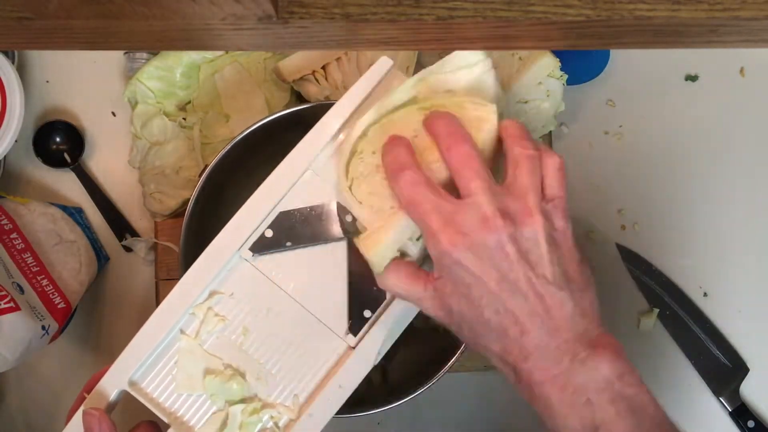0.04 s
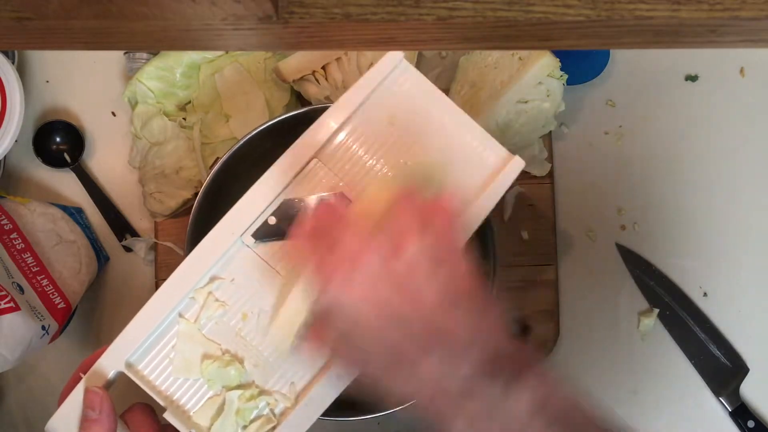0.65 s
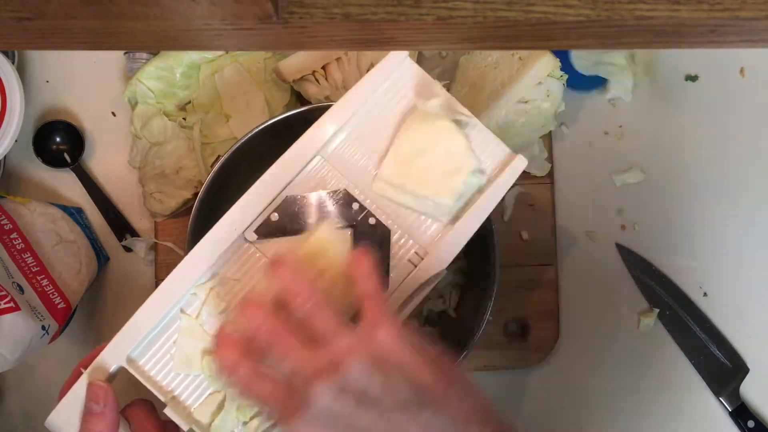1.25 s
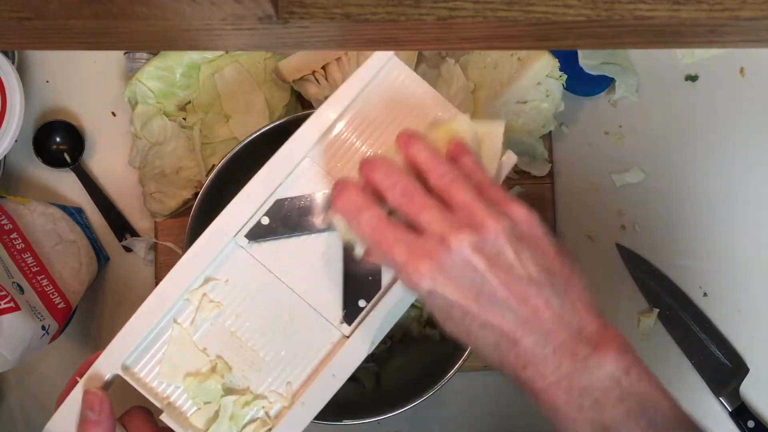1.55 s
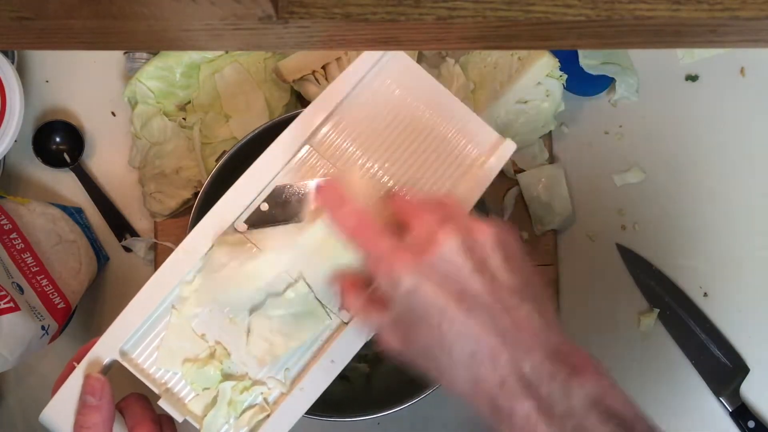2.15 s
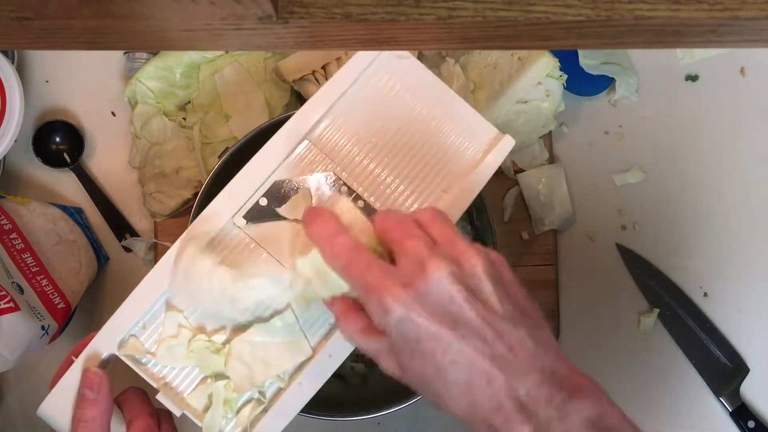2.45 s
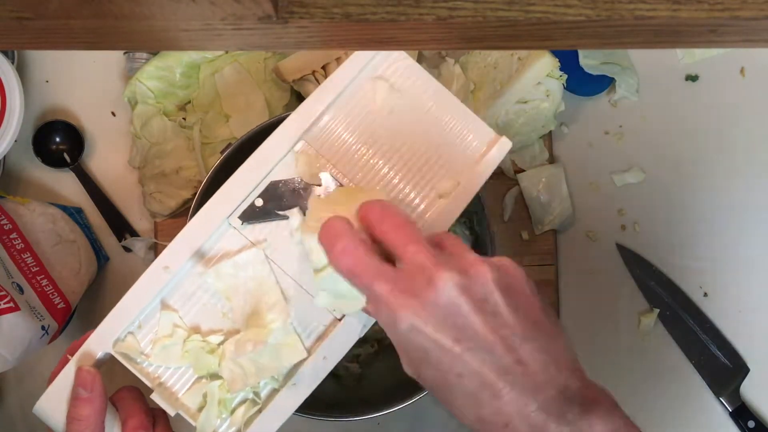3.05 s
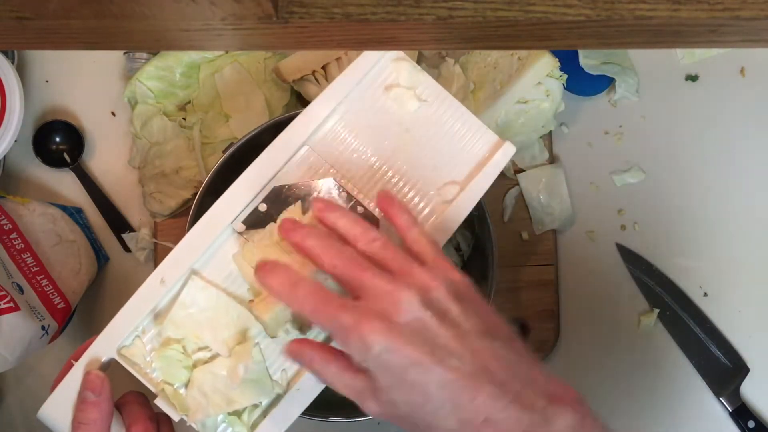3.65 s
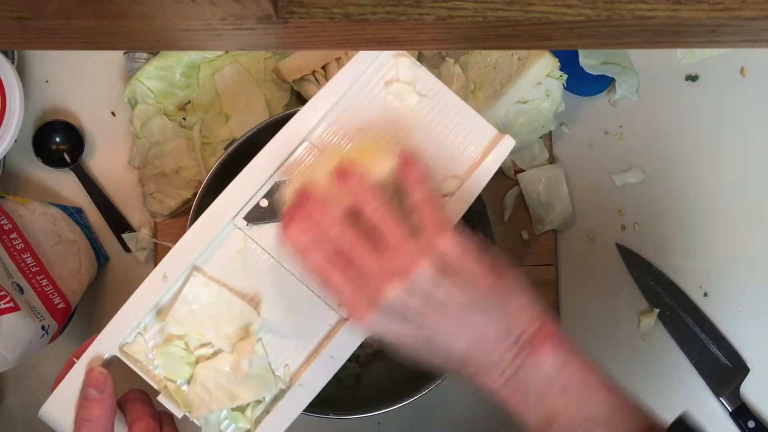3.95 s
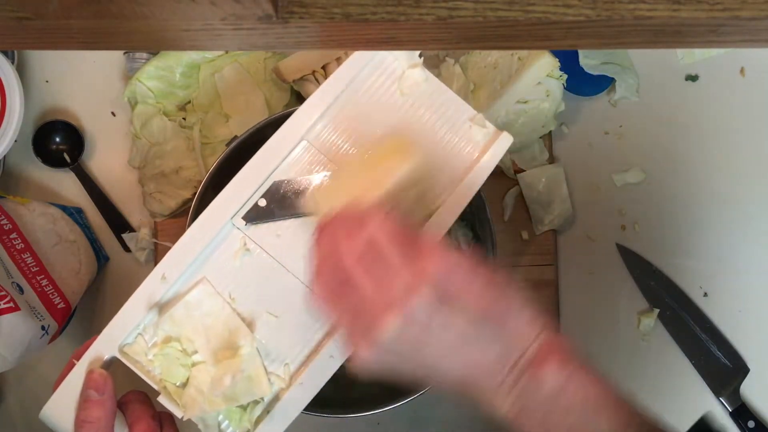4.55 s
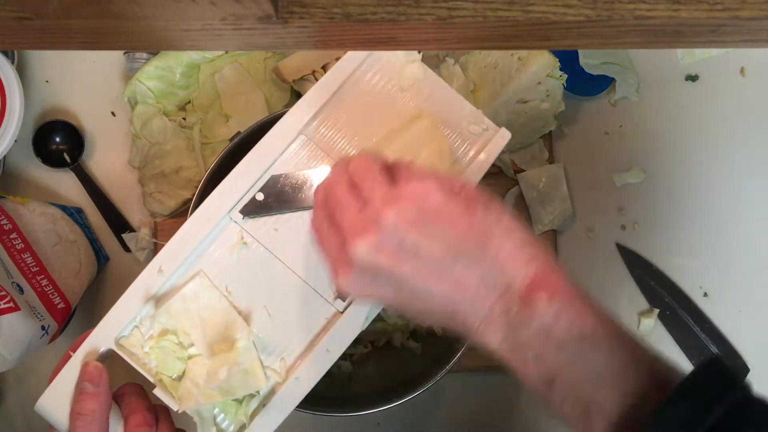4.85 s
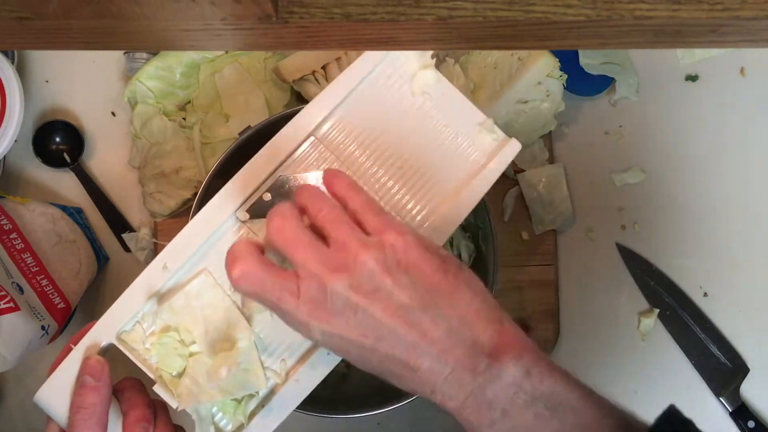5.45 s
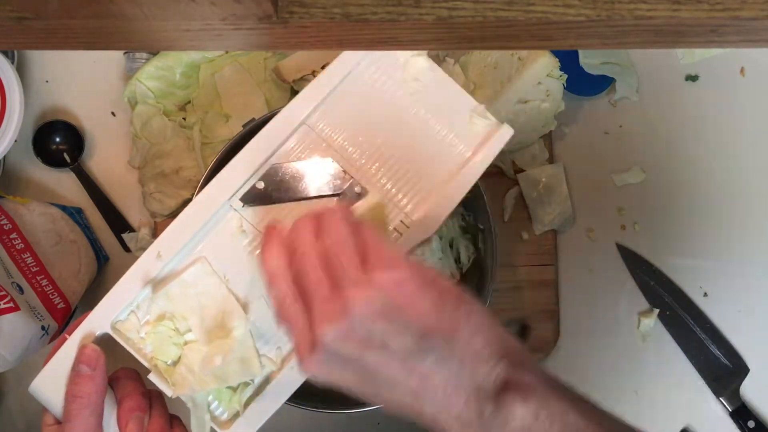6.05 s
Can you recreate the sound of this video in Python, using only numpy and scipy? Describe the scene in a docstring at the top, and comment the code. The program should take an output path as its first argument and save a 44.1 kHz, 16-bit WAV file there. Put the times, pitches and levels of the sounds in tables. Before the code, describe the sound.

Cabbage is pushed back and forth over a plastic slicer, with rasping strokes, crisp snaps and short pauses.

```python
"""In a small kitchen, a chunk of cabbage is pushed to and fro over a plastic slicer resting on a bowl.
From the start, rubbing shakes the frame and the ribbed plate, leaves rasp through the blade, and stiff
ribs snap. Between strokes, loose shreds tick and an appliance hums faintly. After a second and a half
comes the first of a few tiny wet squeaks. The loudest cracks follow between two and three seconds,
and after five seconds the strokes turn mostly lighter and shorter."""
import sys
import numpy as np
from scipy import signal
from scipy.fft import rfft, irfft
from scipy.io import wavfile

SR = 44100
rng = np.random.default_rng(int(sys.argv[2]) if len(sys.argv) > 2 else 0)


def unload_audio(sound):
    """Save the sound as a 16-bit wav file, at the path given as the first command line argument."""
    columns = np.transpose(np.atleast_2d(sound))
    # keep every value between -1 and 1, then stretch to whole-number steps
    steps = np.round(np.clip(columns, -1, 1) * 32767)
    wavfile.write(sys.argv[1], SR, steps.astype(np.int16))


N = 278271
TIME = np.arange(N) / SR
# tone colour of a leaf being cut: pitch_hz, level_db
CUT_SPECTRUM = [(900, -16.5), (2600, 9), (3500, -16.5), (5300, 9), (6900, 0.5), (8000, 4), (11000, 3),
                (13500, 2), (16000, -1.5)]


def undb(db):
    """Turn decibels into a number to multiply by."""
    return 10 ** (np.asarray(db) / 20)


def unit(x):
    """Scale a sound to a total energy of one."""
    return x / np.sqrt(np.sum(x ** 2) + 1e-18)


def steady(x):
    """Scale a sound to an average level (rms) of one."""
    return unit(x) * np.sqrt(len(x))


def through(x, response):
    """Pass a sound through a response: the sound a thing makes after one click."""
    return signal.oaconvolve(x, response)[:len(x)]


def wander(rate):
    """A value that drifts around zero, heading for a new random spot `rate` times a second."""
    return 1.2 * np.interp(TIME * rate, np.arange(8192), rng.standard_normal(8192))


def colour(points, size=4096):
    """A click with the tone colour given by (pitch_hz, level_db) points."""
    hz, db = np.transpose(points)
    grid_hz = np.arange(size // 2 + 1) * SR / size
    gain = undb(np.interp(np.log(grid_hz + 1), np.log(hz), db))
    # these steps pack the energy at the start of the click
    cepstrum = irfft(np.log(gain))
    cepstrum[1:size // 2] *= 2
    cepstrum[size // 2 + 1:] = 0
    return unit(irfft(np.exp(rfft(cepstrum))))


def ringing(modes, size=4096):
    """One fading tone for each mode (a pitch a part rings at); wide modes die first."""
    hz, width, db = np.transpose(modes)[:, :, None]
    t = np.arange(size) / SR
    return undb(db) * width * np.exp(-np.pi * width * t) * np.sin(2 * np.pi * hz * t)


def band(x, low_hz, high_hz, order):
    """Keep what lies between two pitches."""
    return signal.sosfilt(signal.butter(order, [low_hz, high_hz], "band", fs=SR, output="sos"), x)


def echoes(fade_s, db, size=4096):
    """A click followed by a dense patter of echoes that falls 60 dB in fade_s."""
    t = np.arange(size) / SR
    response = undb(db) * unit(rng.standard_normal(size) * undb(-60 * t / fade_s))
    response[0] += 1
    return unit(response)


def uneven(rate, spread_db, unevenness, size=2048):
    """Clicks of uneven strength at uneven times, roughly `rate` a second."""
    gaps, heights = rng.standard_normal((size, 2)).T
    at = (np.cumsum(np.exp(unevenness * gaps)) / rate * SR).astype(int)
    clicks = np.zeros(N)
    clicks[at[at < N]] = undb(spread_db * np.clip(heights[at < N], -2, 2))
    return clicks


def slicer():
    """How frame, plate and blade ring; such small parts give off little sound below their lowest modes."""
    # the frame bending over the bowl: pitch_hz, width_hz, level_db
    frame_modes = [(141.2, 22, 5.5), (219.8, 9.3, 0.5), (261.5, 14, -2.5), (284.4, 36.3, 6.5),
                   (400.6, 12, -3.5), (449.4, 36, -0.5), (493, 37, -15), (575, 305, -14.5), (754, 89, -5),
                   (795.4, 31, -4.5)]
    # the plastic plate ringing: pitch_hz, width_hz, level_db
    plate_modes = [(1150, 39, 4.5), (1247, 97, 0.5), (1380, 40, -34.5), (1569, 53, 5.5), (1662, 45, 11.5),
                   (1874, 29, 13.5), (1967, 39, 7.5), (2097, 100, 8), (2239, 97, 10.5), (2580, 43, -37),
                   (2540, 990, -4.5), (2750, 160, -0.5), (3100, 36, -12.5)]
    # the blade and its seat ringing: pitch_hz, width_hz, level_db
    blade_modes = [(3840, 24, 8.5), (4360, 31, 5), (4900, 110, -5.5), (5320, 100, -2), (5460, 440, 0),
                   (5750, 350, -15), (6410, 240, 5.5), (6660, 15, 4)]
    frame = band(ringing(frame_modes), 178.4, 771, order=7)
    plate = band(ringing(plate_modes), 1290, 4290, order=4)
    blade = band(ringing(blade_modes), 4000, 7270, order=2)
    return frame, plate, blade


def sliding(attack_s=0.0027, release_s=0.022):
    """Strength of rumble, crunch and rasp: each stroke starts fast, swells or eases, and runs out."""
    # pushes, returns and light shifts: start_s, end_s, rumble_db, crunch_db, rasp_db, swell_db
    moves = [(0.0, 0.081, -42, -53, -48.5, -5), (0.117, 0.208, -46, -53, -50.5, -2),
             (0.36, 0.422, -45.5, -52, -50, -0.5), (0.501, 1.115, -43, -49.5, -49, -2),
             (1.2, 1.35, -45, -53.5, -51.5, 1), (1.403, 1.57, -48.5, -55, -52, -3),
             (1.611, 1.787, -46.5, -55, -57, -6), (1.888, 2.074, -69, -70, -63, 16.5),
             (2.11, 2.513, -47, -53.5, -54, 0), (2.698, 3.034, -46.5, -50.5, -50.5, -5.5),
             (3.238, 3.344, -49, -56.5, -52.5, 0.5), (3.359, 3.601, -43, -50, -50, -6.5),
             (3.854, 4.287, -46.5, -52, -51, 3.5), (4.314, 4.764, -48.5, -53, -53, -0.5),
             (4.787, 4.982, -47.5, -51.5, -52, 0.5), (4.993, 5.08, -53, -63.5, -63.5, 7),
             (5.169, 5.494, -58, -67, -67, -1), (5.561, 5.613, -49, -55.5, -61, 2),
             (5.668, 5.715, -53, -57, -58, 5), (5.856, 5.968, -54.5, -71, -71, 1),
             (6.045, 6.277, -47, -58.5, -57.5, 3.5)]
    power = np.zeros((3, N))
    for start, end, *levels_db, swell_db in moves:
        progress = np.clip((TIME - start) / (end - start), 0, 1)
        rise = np.clip((TIME - start) / attack_s, 0, 1)
        fall = np.exp(-np.maximum(TIME - end, 0) / release_s)
        swell = undb(swell_db * (progress - .5))
        power += np.outer(undb(levels_db), rise * fall * swell) ** 2
    return np.sqrt(power)


def jerks(rate, fade_s, spread_db, size=2048):
    """The chunk sticks, then lets go with a jerk that dies away, again and again."""
    fade = np.exp(-np.arange(size) / SR / fade_s)
    return steady(through(uneven(rate, spread_db, unevenness=.5), fade))


def grains(rate, spread_db):
    """Tiny slips or bursting cells: random clicks, about `rate` a second."""
    happens = rng.random(N) < rate / SR
    strength = undb(spread_db * np.clip(rng.standard_normal(N), -2, 2))
    return steady(happens * strength * rng.choice([-1, 1], N))


def leaves(leaf_s=0.026, size=4096):
    """Leaf after leaf passes the blade, each a short swell that peaks early."""
    progress = np.minimum(np.arange(size) / SR / leaf_s, 1)
    swell = np.sin(np.pi * progress ** 0.56) ** 2
    return undb(-3) * steady(through(uneven(rate=34, spread_db=4, unevenness=.65), swell))


def tearing(fade_s, follow_db, size=4096):
    """One fibre gives way, then its neighbours in a quick, fading burst."""
    t = np.arange(size) / SR
    burst = rng.standard_normal(size) * (rng.random(size) < 5000 / SR)
    burst *= undb(follow_db) * np.exp(-t / max(fade_s, 1e-4))
    burst[0] = 1
    return burst


def flicker(x, depth_db, rate):
    """Cells differ in size, so the low and the high treble of their bursting flare up separately."""
    upper = signal.sosfiltfilt(signal.butter(3, 8000, "high", fs=SR, output="sos"), x)
    return upper * undb(depth_db * wander(rate)) + (x - upper) * undb(depth_db * wander(rate))


def strokes(frame, plate, blade):
    """Rubbing shakes the slicer; each leaf at the blade adds a bright rasp, each vein a small snap."""
    rumble, crunch, rasp = sliding()
    # a light touch hardly bends the frame and bursts few cells
    pressure = rumble / np.hypot(rumble, undb(-57))
    # the same jerks drive all three parts, on top of an even rubbing
    grip = steady(jerks(rate=60, fade_s=0.0042, spread_db=4.5) + undb(-3.5))
    slips = grains(rate=6000, spread_db=1.5) * grip * pressure
    cells = grains(rate=14000, spread_db=4.5) * leaves() * pressure
    # thin veins and fine fibres keep breaking, even under a light touch
    breaks = uneven(rate=22, spread_db=4, unevenness=.7)
    veins = steady(through(breaks, tearing(fade_s=.002, follow_db=-11.5))) * undb(-9)
    fibres = grains(rate=150, spread_db=0)
    cut = unit(colour(CUT_SPECTRUM) + undb(-9) * unit(blade.sum(0)))
    low = through((slips * undb(-3.5) + veins * undb(0.5)) * rumble, unit(frame.sum(0)))
    middle = through((slips + cells * undb(-3) + veins) * crunch, unit(plate.sum(0)))
    bright = through((cells * undb(-0.1) + slips * undb(-3.5) + veins + fibres * undb(-11)) * rasp, cut)
    return low + middle + flicker(bright, depth_db=2, rate=190)


def straining(rise_s, size=1024):
    """A swelling crackle of thin fibres as the pressure builds up."""
    crackle = rng.standard_normal(size) * (rng.random(size) < .1)
    return unit(crackle * np.exp(np.arange(-size, 0) / SR / rise_s))


def struck(part, damping_s=0.039):
    """A part is hit at a random spot, so each mode rings more or less; the pressing chunk muffles it."""
    ring = (1 + .25 * rng.standard_normal(len(part))) @ part
    return unit(ring * np.exp(-TIME[:len(ring)] / damping_s))


def cracks(frame, plate, blade):
    """A rib strains and snaps; the same push thumps the frame, rings the plate and ticks at the blade."""
    # ribs snapping and the chunk knocking: start_s, thump_db, ring_db, tick_db, tear_s (stretched below)
    snaps = [(.015, -49, -64, -63, 0.0024), (0.1265, -48.5, -49, -48.5, 0.00092),
             (0.1803, -46, -50, -51.5, 0.00071), (0.3178, -54, -42.5, -50.5, 0.00017),
             (0.3478, -37, -43.5, -39, 0.000071), (0.4114, -49, -62, -42.5, 0.0038),
             (0.459, -50, -47.5, -44, 0.012), (0.5047, -49, -58, -46, .0066), (.56, -49, -59, -43, 0.0036),
             (0.7142, -44, -55, -63, 0.009), (0.7467, -45.5, -48, -63, 0.0018),
             (0.8728, -45, -57, -58, 0.0084), (.9336, -55, -50.5, -62, .0057),
             (0.9963, -40, -41.5, -39.5, 0.0003), (1.0621, -44.5, -42, -41.5, 0.0025),
             (1.3006, -36.5, -47, -48.5, 0.0018), (1.325, -72, -47, -47, 0.0028),
             (1.4433, -40, -64, -48, 0.0039), (1.4596, -66, -38, -40.5, .006),
             (1.5193, -35, -46, -42, 0.0027), (1.6067, -67, -57, -63, .001),
             (1.6981, -47.5, -49.5, -75, 0.00057), (1.718, -65, -47.5, -51, 0.0028),
             (1.775, -41, -56, -54, 0.0016), (1.7835, -54, -42.5, -51.5, 0.0008),
             (1.8422, -73, -71, -58.5, 0.00084), (1.8887, -76, -68, -55, 0.0013),
             (1.9275, -55, -64, -59, 0.0058), (2.1034, -37, -31.5, -33, 0.0035),
             (2.159, -45, -41, -43, 0.0095), (2.1663, -33.5, -27, -30, 0.000086),
             (2.2705, -60, -45, -52, 0.0056), (2.2755, -39.5, -31.5, -34, .0006),
             (2.3321, -42, -34, -36, 0.0018), (2.3785, -68, -52, -44, .002),
             (2.5935, -54, -77, -52.5, 0.0034), (2.6278, -51, -41.5, -50, 0.0002),
             (2.6827, -42.5, -27, -30.5, 0.00066), (2.714, -48, -44, -44, 0.0037),
             (2.7659, -41.5, -47, -44.5, 0.0071), (2.971, -55, -55, -46.5, .002),
             (2.993, -46, -41.5, -45, 0.0044), (3.1929, -57, -62, -59, 0.0041),
             (3.2413, -46.5, -55, -50.5, .0008), (3.3553, -37, -43.5, -38.5, 0.0018),
             (3.4236, -50, -50.5, -53, 0.0023), (3.4937, -56, -47.5, -50, 0.0058),
             (3.529, -51, -46, -49.5, 0.0052), (3.647, -78, -68, -47.5, 0.0012),
             (3.827, -80, -77, -58.5, 0.0011), (3.8595, -51, -46.5, -41.5, 0.0068),
             (3.982, -45, -49, -45, 0.0018), (4.1227, -46, -50.5, -55, 0.015),
             (4.232, -51, -45.5, -45, 0.0015), (4.2589, -49.5, -39.5, -46, 0.0027),
             (4.3244, -51, -57, -57, 0.00084), (4.435, -53, -60, -49, 0.0018),
             (4.529, -46.5, -50.5, -51, 0.0026), (4.7488, -70, -49.5, -59, 0.00078),
             (4.8544, -46, -45, -45, 0.0045), (5.0838, -51, -55, -52.5, 0.00012),
             (5.138, -73, -78, -60.5, .0008), (5.2183, -57, -56, -72, 0.00074),
             (5.2475, -62, -75, -58.5, .003), (5.267, -62, -58, -61, .0003),
             (5.342, -54.5, -52, -57.5, .0009), (5.3826, -48, -67, -80, 0.0013),
             (5.4975, -64, -52, -42, 0.0032), (5.5011, -45, -35, -37, 0.0029),
             (5.6046, -49.5, -40.5, -46.5, 0.0008), (5.855, -44.5, -45.5, -51.5, 0.00054),
             (5.865, -53, -42, -48.5, .0002), (5.933, -61, -61, -57, 0.0017),
             (6.0327, -42, -32.5, -37.5, .0003), (6.041, -45, -35, -40.5, 0.0022),
             (6.059, -63, -47, -48, .0014), (6.09, -52, -42.5, -47.5, 0.0032),
             (6.157, -44.5, -44, -50.5, 0.0021), (6.222, -62, -47, -61, 0.00055),
             (6.2481, -39.5, -59, -35.5, 0.00037), (6.2522, -44.5, -38, -51, .0005)]
    # tone colour of a snapping rib: pitch_hz, level_db
    snap_spectrum = [(700, -22), (1200, -7.5), (2600, 8), (3500, -12.5), (5500, 5.5), (6400, -3.5),
                     (6900, -7.5), (8000, 1), (9700, -4.5), (11200, -0.5), (13000, -8.5), (16000, -1)]
    average_s = .02  # each level counts as if the sound were spread over this time
    out = np.zeros(N + SR)
    # a hard snap favours the plate's upper modes, the soft chunk the frame's lowest
    hard = colour([(1100, -2.5), (1500, -4.5), (1700, -0.5), (1900, 2.5),
                   (2250, 6.0), (2600, 2.5), (3300, 0.5)], size=512)
    soft = colour([(280, 0.5), (500, -3), (800, -1.5)], size=512)
    for start_s, thump_db, ring_db, tick_db, tear_s in snaps:
        strain = undb(-14) * straining(rise_s=0.00097)
        push = np.concatenate([strain, unit(tearing(tear_s * 1.6, follow_db=-10.5))])
        # ribs differ in thickness, and so in the colour of their snap
        snap = colour([(hz, db + 2 * rng.standard_normal()) for hz, db in snap_spectrum])
        tick = through(snap + undb(-7) * struck(blade), echoes(fade_s=0.048, db=-1.5))
        ring = through(through(struck(plate), hard), echoes(fade_s=0.045, db=-4))
        thump = through(through(struck(frame), soft), echoes(fade_s=0.043, db=-6))
        parts = (thump, thump_db), (ring, ring_db), (tick, tick_db)
        crack = sum(undb(db) * unit(through(push, part)) for part, db in parts)
        first = max(int(start_s * SR) - len(strain), 0)
        out[first:first + len(crack)] += crack * np.sqrt(average_s * SR)
    return out[:N]


def shreds(level_db=-70.5):
    """Loose shreds settle on the plate and in the bowl with faint, bright ticks."""
    tick = through(colour(CUT_SPECTRUM), echoes(fade_s=.04, db=-1))
    landings = uneven(rate=16, spread_db=7, unevenness=0.64)
    return undb(level_db) * steady(through(landings, tick))


def kitchen(air_db=-62.5):
    """Soft room noise and the slightly wavering hum of an appliance."""
    # tone colour of the quiet room: pitch_hz, level_db
    air_spectrum = [(25, -38), (80, -32), (130, -23), (205, -2), (300, -3), (380, -10.5), (470, -6),
                    (540, -17.5), (780, -10), (900, -22), (1600, -21), (3000, -31), (6000, -34.5),
                    (16000, -35.5)]
    # tones of the appliance: pitch_hz, level_db
    hum_tones = [(474, -72.5), (1599, -76)]
    air = steady(through(rng.standard_normal(N), colour(air_spectrum))) * undb(air_db + wander(4.11))
    hum = np.zeros(N)
    for hz, db in hum_tones:
        level = undb(db + wander(12))
        pitch_hz = hz * (1 + 0.0015 * wander(14))
        hum += level * np.sin(2 * np.pi * np.cumsum(pitch_hz) / SR)
    return air + np.sqrt(2) * hum


def squeaks():
    """A wet leaf or fingertip sticks and slips very fast: a brief tone that mostly falls as it slows."""
    # squeaks on the smooth plate: start_s, length_s, start_pitch_hz, end_pitch_hz, level_db
    glides = [(1.565, 0.014, 6530, 6370, -49), (1.803, .016, 15800, 15100, -53),
              (1.818, .014, 15800, 15200, -61), (3.644, 0.021, 6420, 6480, -58),
              (5.383, 0.0117, 1300, 587, -56.5)]
    out = np.zeros(N)
    waver = 1 + 0.0048 * wander(600)
    for start_s, length_s, start_hz, end_hz, db in glides:
        progress = np.clip((TIME - start_s) / length_s, 0, 1)
        hz = (start_hz + (end_hz - start_hz) * progress) * waver
        out += 2 * undb(db) * np.sin(np.pi * progress) * np.sin(2 * np.pi * np.cumsum(hz) / SR)
    return out


def scene():
    """Slicing close by, with the short echo and the quiet hum of the kitchen."""
    parts = slicer()
    near = strokes(*parts) + cracks(*parts) + squeaks() + shreds()
    room = echoes(fade_s=0.17, db=-19, size=16384)
    return (through(near, room) + kitchen())[None]


def record(dry):
    """Cut away the very highest treble."""
    top_hz = 15950
    return signal.sosfilt(signal.ellip(10, .2, 70, top_hz, fs=SR, output="sos"), dry)


dry = scene()
out = record(dry)
unload_audio(out)
```